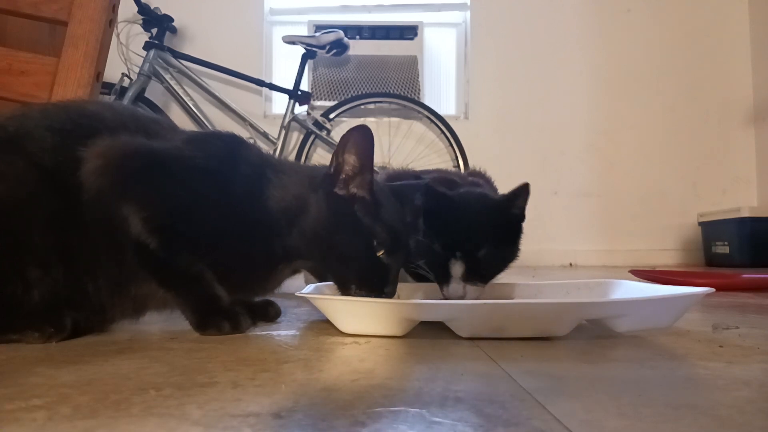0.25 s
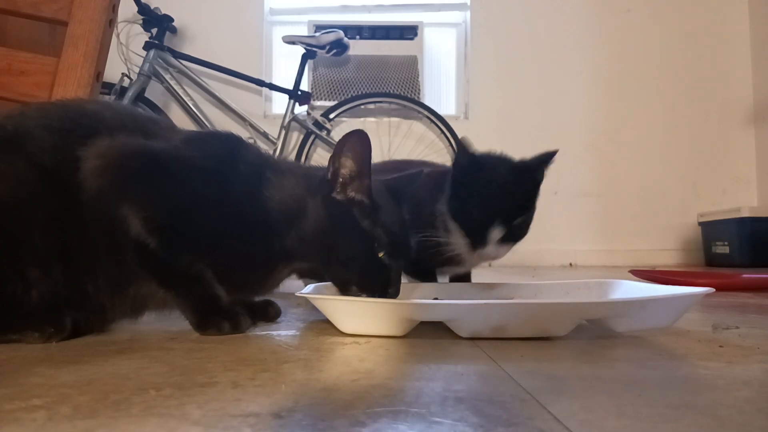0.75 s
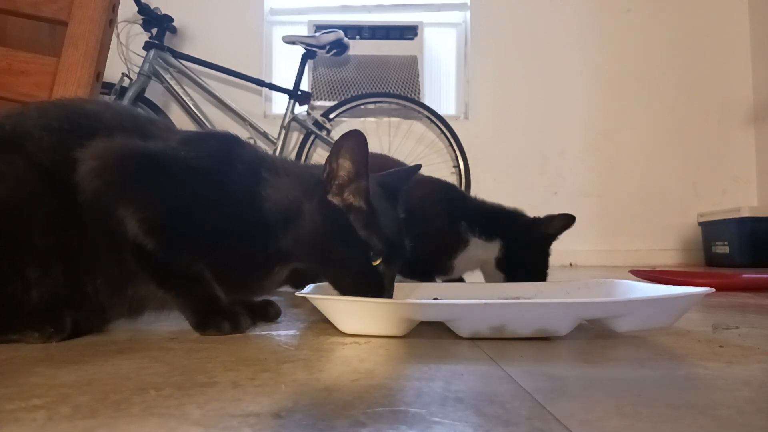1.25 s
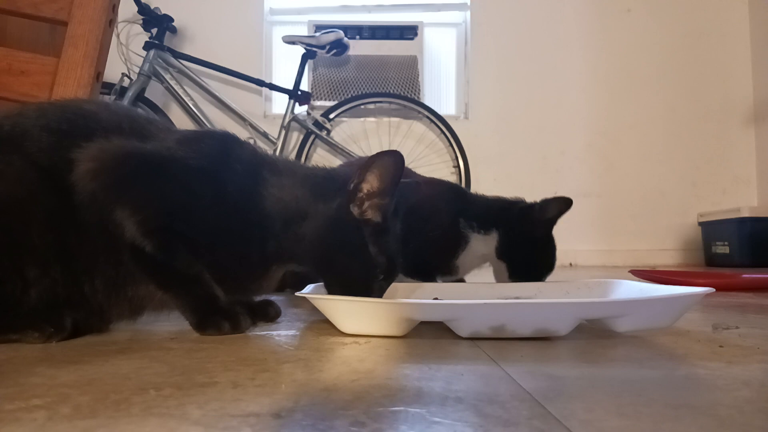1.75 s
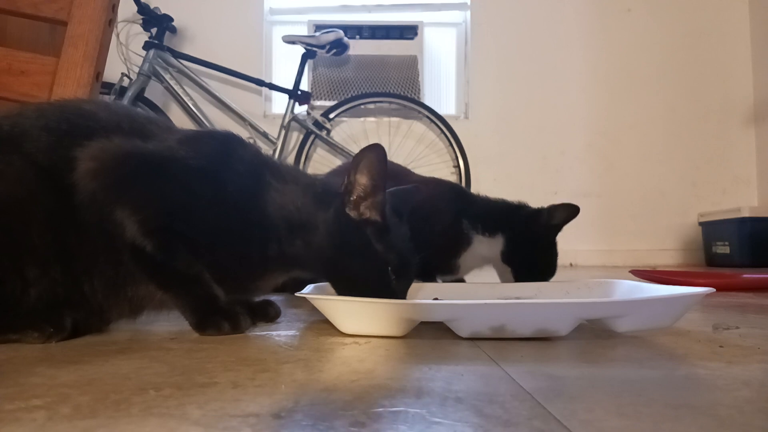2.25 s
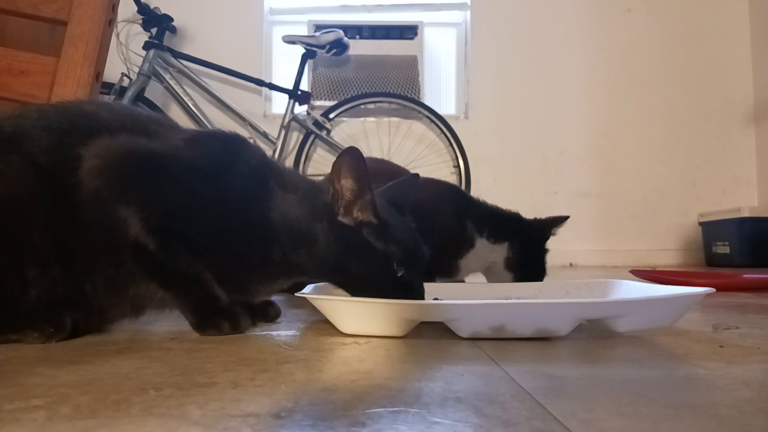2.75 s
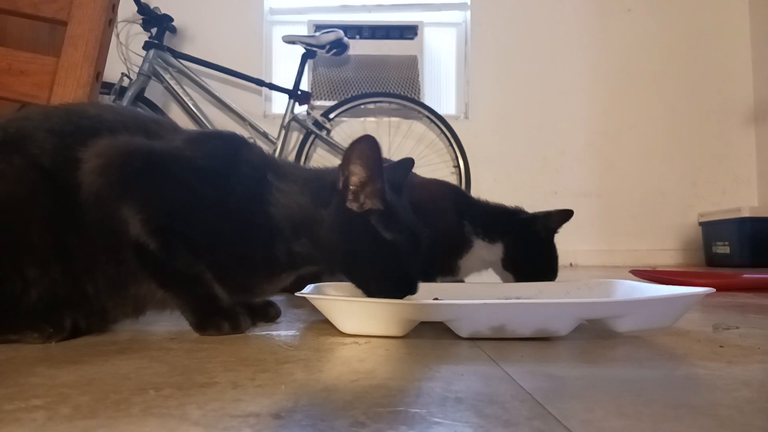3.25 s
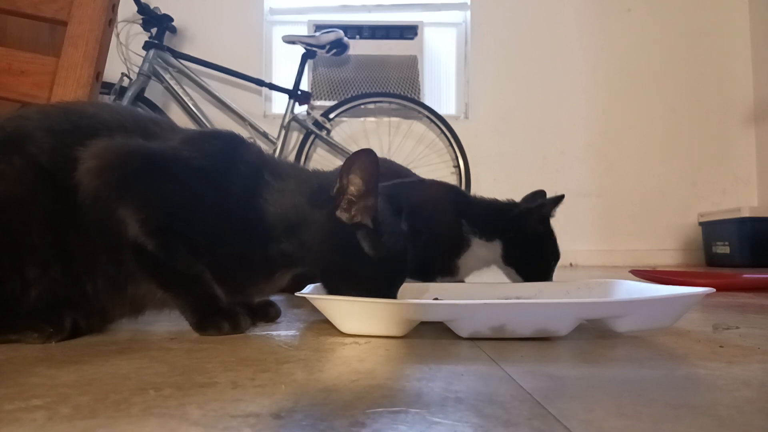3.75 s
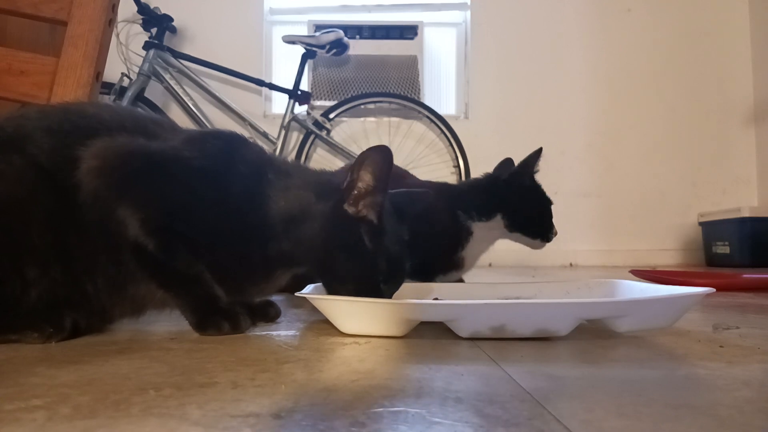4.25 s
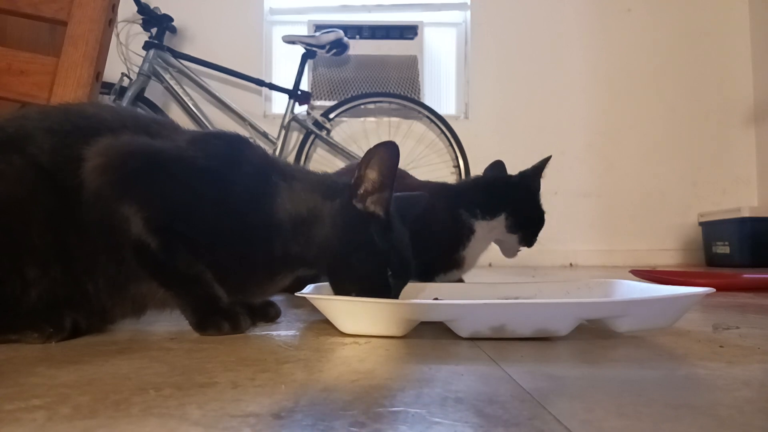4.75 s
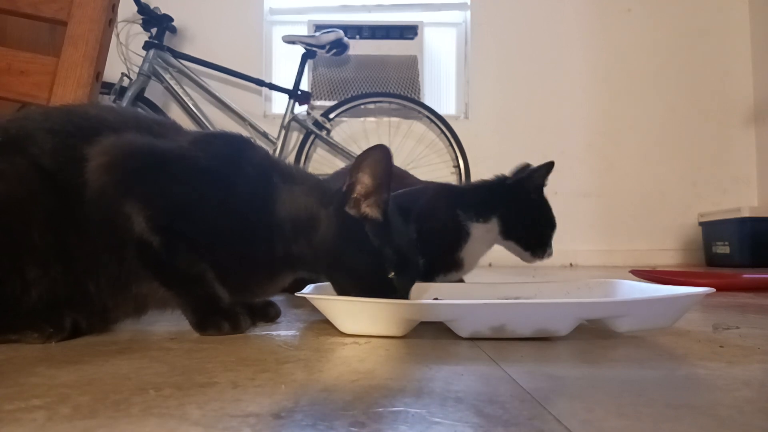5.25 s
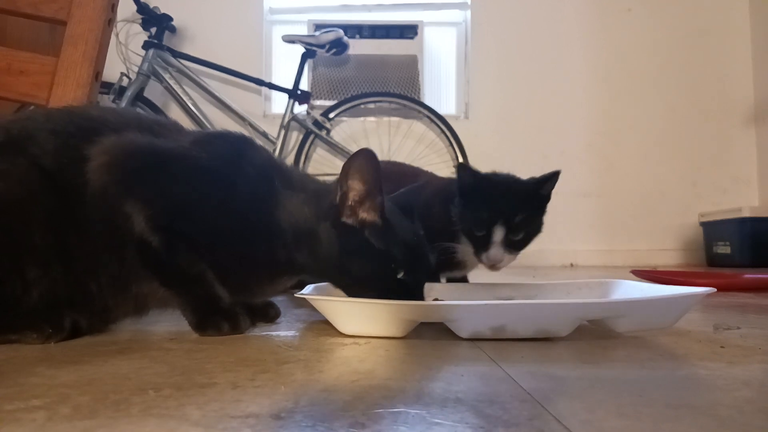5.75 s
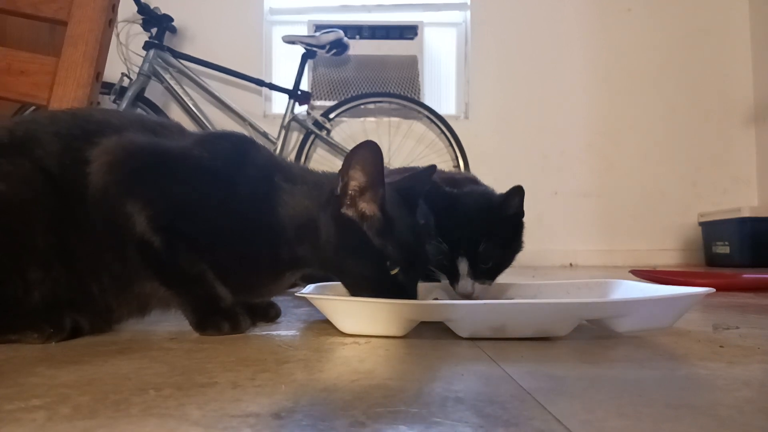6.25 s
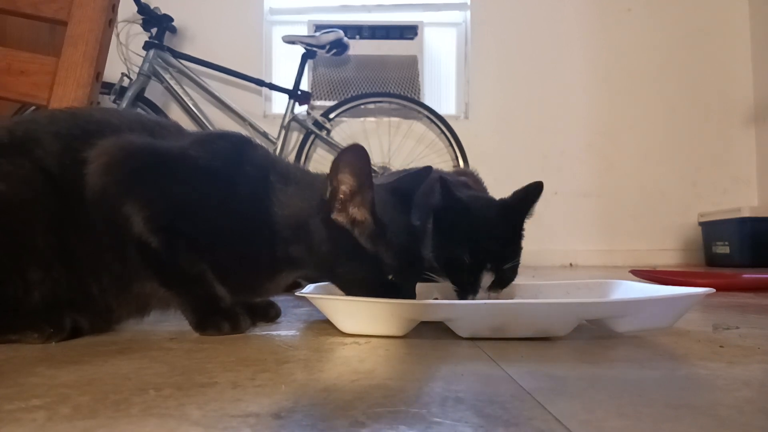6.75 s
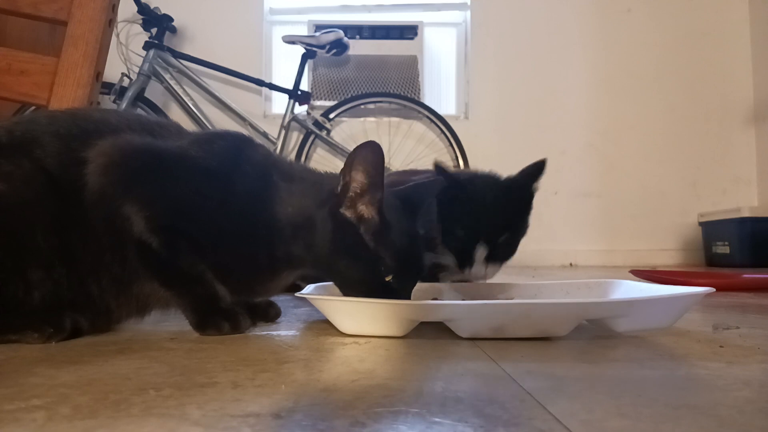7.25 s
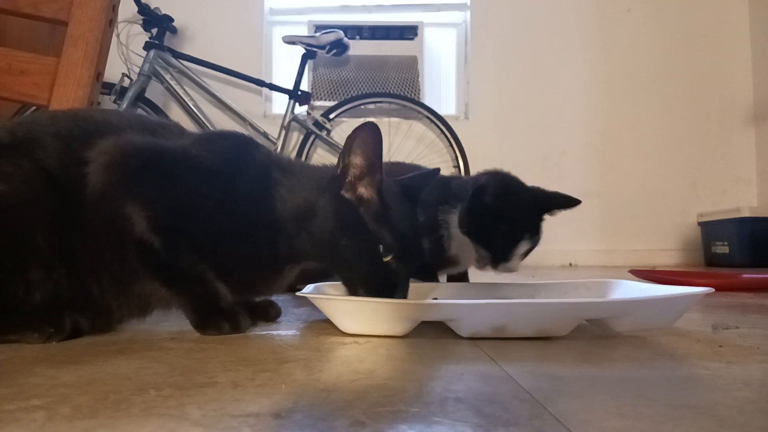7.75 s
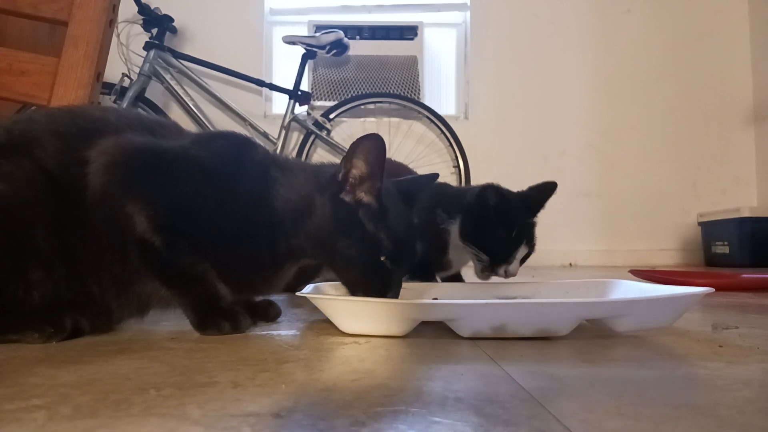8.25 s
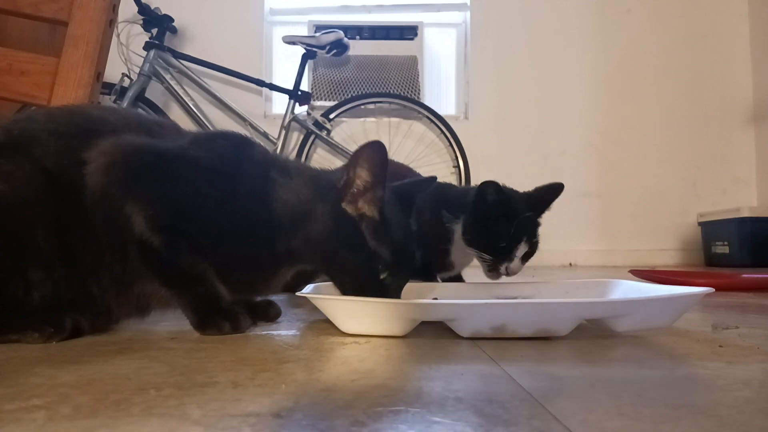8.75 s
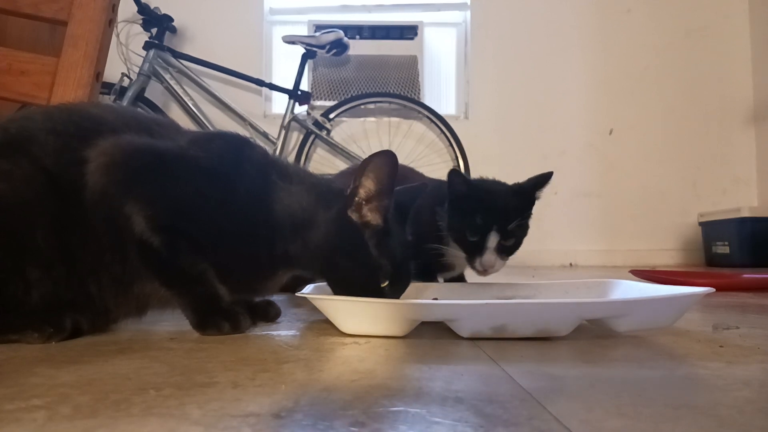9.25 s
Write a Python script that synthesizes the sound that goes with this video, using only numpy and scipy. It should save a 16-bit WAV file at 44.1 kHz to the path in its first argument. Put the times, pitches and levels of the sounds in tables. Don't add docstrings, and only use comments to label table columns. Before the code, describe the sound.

Dry, brittle cat-food crunching in uneven clusters, about half a metre from the microphones. Each bite is a snap with a few milliseconds of splintering. Tiny teeth clicks, short rasps and very faint nose whistles fill gaps, while hollow pellet knocks and scratchy pushes ring the tray. Busiest near the start and around seven seconds, thinning at the end, with short echoes in a bare indoor room.

```python
import sys
import numpy as np
from scipy import signal
from scipy.fft import rfft, irfft, next_fast_len
from scipy.io import wavfile
from scipy.ndimage import uniform_filter1d

SR = 44100
rng = np.random.default_rng(int(sys.argv[2]) if len(sys.argv) > 2 else 0)


def generate_wav(sig):
    pcm = np.round(np.clip(np.atleast_2d(sig).T, -1, 1) * 32767).astype(np.int16)
    wavfile.write(sys.argv[1], SR, pcm)


def ratio(d):
    e = np.asarray(d, float) / 20
    return 10 ** e


N = 419391


def unit(x):
    return x / np.sqrt(np.mean(x ** 2))


def even(x):
    return x / np.sqrt(np.sum(x ** 2, axis=-1, keepdims=True))


def on_log(hz, table):
    f, v = np.transpose(table)
    return np.interp(np.log(hz + 1), np.log(f), v)


def ring(f, hz, width_hz):
    return 1j * f * width_hz / (hz ** 2 - f ** 2 + 1j * f * width_hz)


def modes(f, table):
    return sum(ratio(db) * ring(f, hz, width_hz) for hz, width_hz, db in table)


def shape(x, gain):
    length = x.shape[-1]
    size = next_fast_len(length + min(4096, length // 2))
    f = np.arange(size // 2 + 1) * SR / size
    return irfft(rfft(x, size) * gain(f), size)[..., :length]


def walk(rate_hz):
    hold = int(SR / rate_hz)
    steps = np.repeat(rng.standard_normal(N // hold + 1), hold)
    return 1.3 * uniform_filter1d(uniform_filter1d(steps, hold), hold)[:N]


def splinters(size, rate_hz, spread_db):
    struck = rng.random(size) < rate_hz / SR
    size_db = spread_db * np.minimum(rng.exponential(size=size), 2.5)
    return struck * rng.standard_normal(size) * ratio(size_db)


# f/Hz, likeness/0-1
PORT_LIKENESS = [(60, 0.9), (200, 0.7), (640, 0.3), (1500, 0.5), (15000, 0)]


def alike(gain):
    like = lambda f: np.clip(on_log(f, PORT_LIKENESS), 0, 1)
    mid = shape(rng.standard_normal(N), lambda f: gain(f) * np.sqrt(1 + like(f)))
    side = shape(rng.standard_normal(N), lambda f: gain(f) * np.sqrt(1 - like(f)))
    return np.array([mid + side, mid - side]) / np.std(mid)


# f/Hz, density/dB per Hz
HISS = [(88, -39.5), (150, -2), (391, -6.5), (1480, -9.5), (2400, -13.5), (5000, -15), (12900, -13.5),
        (16000, -18)]
# t/s, level/dB
RUMBLE_LEVEL = [
    (0.0, -65),
    (5.529, -69),
    (5.72, -62.5),
    (6.62, -72.5),
    (7.12, -61),
    (7.41, -73),
    (7.52, -58),
    (7.95, -67),
    (9.51, -65),
]
# f/Hz, width/Hz, level/dB
RUMBLE_RINGS = [(58.1, 19, 3.5), (100, 13, 0), (133, 98, -14.5)]
HISS_DB = -71.5
GATE_DB, GATE_KNEE_DB, GATE_S = -4, -65.5, 0.068
TREBLE_GATE_DB, TREBLE_GATE_HZ = -5, 3700


def hum(food):
    low = alike(lambda f: sum(ratio(db) * np.abs(ring(f, hz, w)) ** 1.36 for hz, w, db in RUMBLE_RINGS))
    hiss = alike(lambda f: ratio(on_log(f, HISS)))
    busy = uniform_filter1d(np.abs(food[0]), int(GATE_S * SR))
    quiet = ratio(GATE_KNEE_DB) / (ratio(GATE_KNEE_DB) + busy)
    treble = shape(hiss, lambda f: 1 / (1 + (TREBLE_GATE_HZ / (f + 1)) ** 8))
    hiss = hiss + (ratio(TREBLE_GATE_DB * quiet) - 1) * treble
    rumble_db = np.interp(np.arange(N) / SR, *np.transpose(RUMBLE_LEVEL)) - 0.65 + 1.4 * walk(5.4)
    hiss_db = HISS_DB + GATE_DB * quiet + 0.54 * walk(5.7)
    return ratio(rumble_db) * low + ratio(hiss_db) * hiss


# f/Hz, t60/s, level/dB
ECHO_BANDS = [(236, 0.39, -27.5), (767, 0.35, 5.5), (2160, 0.19, -16), (4700, 0.62, -2.5),
              (10700, 0.13, -19)]
ROOM_DB, FIRST_WALL_S = -3, .012


def room(feed, length=40000):
    t = np.arange(length) / SR
    wall = np.clip((t - FIRST_WALL_S) / .001, 0, 1)
    rise = .55 * (t > .003) + wall * (.45 + .4 * np.exp(-np.abs(t - FIRST_WALL_S) / .006))
    noise = rng.standard_normal((2, length))
    noise = noise + shape(rng.standard_normal(length), lambda f: 2.0 / (1 + (f / 500) ** 2))
    echo = sum(ratio(db - 60 * t / t60_s) * shape(noise, lambda f: np.abs(ring(f, hz, 2.1 * hz)))
               for hz, t60_s, db in ECHO_BANDS)
    return signal.fftconvolve(feed[None], ratio(ROOM_DB) * even(rise * echo), axes=1)[:, :N]


# t/s, length/s, f/Hz, level/dB
NOSE_WHISTLES = [(3.8, 0.15, 2950, -74), (8.31, .09, 1950, -64), (4.235, 0.06, 1600, -68),
                 (3.425, .03, 2450, -62), (3.05, .1, 2500, -64), (8.68, .2, 3900, -72),
                 (8.42, .15, 5200, -64), (7.445, .035, 2650, -58), (4.775, 0.039, 2020, -70),
                 (4.75, 0.16, 3490, -76.5), (4.25, 0.14, 3500, -68), (4.4, .15, 3500, -78),
                 (4.9, 0.06, 2840, -80), (5.22, 0.1, 2750, -86), (5.04, .07, 2700, -92),
                 (5.135, 0.028, 1500, -84)]


def sniffs():
    out, t, air = np.zeros(N), np.arange(16384) / SR, rng.standard_normal(N)
    for start_s, length_s, hz, db in NOSE_WHISTLES:
        span = slice(int(start_s * SR), int(start_s * SR) + len(t))
        breath = np.sin(np.pi * np.clip(t / length_s, 0, 1))
        out[span] += ratio(db) * breath * unit(shape(air[span], lambda f: ring(f, hz, 200) ** 2))
    return out


# t/s, length/s, level/dB, f/Hz
RASPS = [
    (.469, .019, -33.5, 4700),
    (.219, 0.028, -47, 3300),
    (.203, 0.0054, -52, 8000),
    (7.479, 0.015, -52, 1800),
    (7.41, .07, -58, 6000),
    (4.548, .04, -62, 7000),
    (3.765, .03, -60, 3300),
    (1.883, .012, -56, 3500),
    (2.666, .012, -45, 2900),
]
RASP_EDGE_S = .0015


def scrapes():
    out, t = np.zeros((2, N)), np.arange(4096) / SR
    for start_s, length_s, db, hz in RASPS:
        rasp = rng.standard_normal(4096) + .7 * rng.standard_normal((2, 4096))
        rasp = unit(shape(rasp, lambda f: ring(f, hz, 1.9 * hz) ** 2))
        window = np.clip(np.minimum(t, length_s - t) / RASP_EDGE_S, 0, 1)
        at = int(start_s * SR)
        out[:, at:at + 4096] += ratio(db) * window * rasp
    return out


# start t/s, loudest t/s, end t/s, rattle level/dB, brightness/dB
TRAY_PUSHES = [(-.05, 0.005, 0.076, -29.5, -15), (.2, 0.15, 0.7, -40.5, -14.5),
               (0.515, 0.2, 0.54, -28.5, 1.5), (1.25, 1.297, 1.44, -49, -33), (2.0, 2, 2.3, -49, -11.5),
               (2.499, 2.58, 2.665, -39, -11), (2.664, 2.7, 2.784, -33, -12.5), (2.8, 2.86, 2.91, -35, -10),
               (2.92, 2.97, 3.01, -39, -25), (4.54, 4.61, 4.72, -48.5, -7), (5.295, 5.33, 5.35, -43, -13),
               (5.36, 5.39, 5.44, -48.5, -15), (5.499, 5.68, 5.81, -33, -26),
               (5.719, 5.82, 5.88, -36.5, -13), (5.9, 6, 6.34, -40.5, -19), (6.58, 6.5, 7.34, -48.5, -20.5),
               (6.753, 7, 6.85, -38.5, 5.5), (6.898, 6.96, 7.12, -39.5, -5.5), (7.043, 7, 7.2, -30.5, -27),
               (7.405, 7.42, 7.42, -50, -6), (7.488, 7.535, 7.56, -22, -42), (7.6, 7.68, 7.76, -40.5, -26),
               (8.91, 9, 9.3, -62, 2), (6.87, 6.925, 6.96, -52, 12), (6.58, 6.64, 6.67, -60, 12),
               (7.08, 7.098, 7.12, -42, 8), (2.25, 2.4, 2.5, -60, 6), (5.96, 6.0, 6.03, -50, 8)]
# f/Hz, width/Hz, level/dB
TRAY_RINGS = [(785, 30, 2.5), (1056, 340, 5.5), (1370, 59, 0), (1670, 71, -6)]
PUSH_EDGE_DB, PUSH_FADE_S = -16.5, 0.017


def pushes():
    t, level, bright = np.arange(N) / SR, np.zeros(N), np.zeros(N)
    for *times_s, db, bright_db in TRAY_PUSHES:
        swell_db = np.interp(t, times_s, [PUSH_EDGE_DB, 0, PUSH_EDGE_DB])
        window = np.clip(np.minimum(t - times_s[0], times_s[-1] - t) / PUSH_FADE_S + .5, 0, 1)
        push = window * ratio(db + swell_db)
        level += push
        bright += push * ratio(bright_db)
    knocks = splinters(N, 700, 3.5) + .7 * splinters((2, N), 2000, 2.5)
    knocks = ratio(2 * walk(60)) * knocks
    tray = shape(knocks, lambda f: ring(f, 2305, 1640) * (0.45 + modes(f, TRAY_RINGS)))
    scratch = unit(knocks) + 1.7 * rng.standard_normal((2, N))
    scratch = shape(scratch, lambda f: ring(f, 3800, 7700) ** 2)
    return (level * unit(tray) + bright * unit(scratch)) * ratio(-9.5)


# t/s, peak level/dB, ring f/Hz, thud/dB re peak
HARD_BITES = [(.03, -18.5, 2500, -11), (.52, -16.5, 2700, -9.5), (.578, -24, 2450, 2),
              (1.155, -45.5, 1490, -5), (1.572, -33, 4900, 1), (2.086, -23, 1030, -19),
              (2.087, -23.5, 4000, -36), (2.73, -29, 1480, -3), (2.931, -32, 980, -33),
              (3.216, -21.5, 3560, -40), (3.554, -19, 980, -9), (3.596, -29.5, 950, -23),
              (4.245, -42, 1560, 8.5), (5.034, -43, 3460, 2.5), (5.748, -25, 1750, -3),
              (6.419, -28, 1591, -16), (6.744, -31, 1490, -10), (7.07, -28.5, 660, 2),
              (7.167, -26.5, 1437, 6), (8.114, -15.5, 3300, -6.5), (8.19, -40, 520, 5),
              (8.288, -37, 2089, -10), ]
# t/s, peak level/dB, ring f/Hz, splinter/dB re peak
BRIGHT_SHATTERS = [(.22, -34, 2360, 2), (0.316, -28, 4240, -7), (2.883, -29.5, 2660, 11),
                   (3.785, -38, 3220, 3), (0.487, -15, 2790, 5), (2.43, -52, 1800, 23.5),
                   (7.169, -32, 1670, 15), (.548, -15.5, 1850, 11.5), (2.509, -54, 2470, 24.5),
                   (2.545, -39, 1650, 1), (3.872, -16.5, 7340, 8.5), (4.296, -33.5, 546, 15),
                   (4.298, -36, 626, -16), (4.545, -62, 1900, 26.5), (4.56, -51.5, 2200, 26),
                   (5.532, -44, 1670, 27), (6.391, -50, 1530, 21), (7.095, -15.5, 1290, -5.5),
                   (7.743, -22, 1687, 1), (8.089, -40, 1700, 17), (8.116, -14.5, 6900, 5.5),
                   (6.421, -30.5, 5060, 13), (6.758, -21, 5230, 6), (3.219, -26.5, 5560, -3.5),
                   (.549, -25, 5250, 6), (5.998, -39.5, 1600, 17.5), (8.916, -48.5, 1720, 21.5),
                   (9.086, -39, 3330, 12), (9.111, -42, 1720, 20), (2.566, -39.5, 1500, 21),
                   (9.266, -47, 2930, 1)]
# t/s, peak level/dB, ring f/Hz, splinter/dB re peak
SLOW_GRINDS = [(.376, -22.5, 1080, -7), (.426, -20, 1830, -1), (.468, -19, 2330, 4.5), (.523, -22, 2600, 0),
               (1.883, -42.5, 2540, 6), (2.69, -21.5, 1900, -10), (5.906, -24, 1420, -1),
               (7.06, -21, 2210, 0.5), (7.535, -23.5, 1700, -10.5), (.524, -20.5, 3000, -7),
               (2.669, -33.5, 1700, 1.5), (0.018, -26, 2300, -10.5)]
# t/s, peak level/dB, ring f/Hz
NEAR_CAT_TICKS = [(1.133, -49, 4070), (1.231, -53, 2440), (1.248, -47, 4500), (1.254, -36.5, 4200),
                  (1.257, -33.5, 5600), (1.502, -54, 3500), (1.564, -46, 5000), (1.302, -26, 5300),
                  (1.346, -30, 5050), (1.413, -40, 1980), (1.547, -47, 5330), (1.897, -26, 5560),
                  (1.99, -38, 5200), (2.014, -45, 4030), (2.033, -26, 4000), (2.037, -22.5, 4030),
                  (1.999, -44, 4000), (.789, -52, 6400), (.807, -47, 5200), (.813, -40, 5190),
                  (.827, -41, 4800), (.843, -48, 6600), (4.965, -55, 4500), (2.522, -42.5, 2180),
                  (2.809, -30, 2850), (2.827, -27.5, 2740), (3.047, -33.5, 2460), (3.083, -37, 2460),
                  (3.103, -41, 2380), (3.161, -32.5, 2650), (3.397, -50, 5000), (3.432, -39.5, 2460),
                  (3.5, -34, 2050), (3.77, -37.5, 3180), (3.228, -42, 6000), (4.999, -43, 3680),
                  (5.135, -60, 6000)]
# t/s, peak level/dB, ring f/Hz
FAR_CAT_TICKS = [(7.416, -44, 4700), (7.449, -50, 1300), (7.84, -36, 2945), (7.846, -35, 3627),
                 (7.854, -37, 4550), (8.341, -47, 4500), (8.659, -52, 6100), (8.289, -36, 4700),
                 (8.396, -56, 4000), (7.951, -38, 2350), (8.006, -44.5, 1740), (8.042, -48, 2400),
                 (8.306, -28, 1980), (8.411, -25, 3860), (8.42, -22.5, 5600), (8.461, -28.5, 1490),
                 (8.673, -30.5, 1670), (8.942, -42, 1350), (8.972, -44, 3280), (8.99, -53.5, 3120),
                 (9.068, -51, 3770), (9.158, -42, 1100)]
# t/s, peak level/dB, ring f/Hz
TRAY_KNOCKS = [(.203, -38, 2280), (.304, -29, 1280), (0.362, -33, 1700), (.86, -49, 1350),
               (2.34, -42.5, 1770), (2.429, -46.5, 1750), (2.565, -36.5, 1520), (2.646, -29, 1800),
               (2.678, -26.5, 1700), (2.683, -25.5, 1980), (2.956, -26.5, 1700), (3.566, -26, 1490),
               (3.657, -38, 5470), (4.597, -39.5, 1390), (4.662, -48.5, 1240), (5.307, -40, 1480),
               (5.328, -41, 1500), (5.347, -47.5, 1490), (5.386, -41.5, 1420), (5.394, -52, 1210),
               (5.986, -31.5, 1860), (5.86, -37, 1570), (5.795, -31, 1390), (5.507, -48, 1120),
               (5.627, -28, 1560), (5.654, -34, 1380), (5.708, -23.5, 1670), (5.822, -27, 1380),
               (5.929, -18.5, 1670),
               (6.045, -31, 1750), (6.069, -23.5, 1480), (6.2, -43, 1590), (6.237, -34.5, 1704),
               (6.269, -25, 1740), (6.289, -34, 1740), (6.356, -38.5, 1660), (6.559, -44, 1140),
               (6.596, -46.5, 1070), (6.642, -37, 1160), (6.706, -29, 1340), (6.757, -26.5, 1580),
               (6.842, -30.5, 1200), (6.877, -28.5, 980), (6.929, -30, 1520), (6.983, -25.5, 1470),
               (7.071, -21, 1800), (7.253, -26.5, 1780), (7.416, -40, 1087), (7.543, -18.5, 1840),
               (7.659, -25, 1440), (7.705, -23, 1700), (7.774, -36.5, 1603), (7.781, -33.5, 1603),
               (6.572, -48, 1100), (6.666, -43, 1100), (6.775, -31, 1200), (6.942, -33.5, 1500),
               (7.077, -22.5, 1500)]
# t/s, peak level/dB, ring f/Hz
TRAY_SHOVES = [(7.491, -25.5, 915), (7.498, -27, 1000), (7.504, -14, 1140), (7.509, -17.5, 1290),
               (7.515, -22, 1300), (7.522, -20.5, 1000), (7.531, -19.5, 1500), (7.539, -21, 1790),
               (7.542, -19.5, 1700), (7.549, -23, 1300), (7.569, -28.5, 1100), (7.575, -27, 1500),
               (7.596, -29, 1200), (.002, -27.5, 1510), (.05, -31, 2210), (.862, -46, 3020)]
# t/s, peak level/dB, ring f/Hz
CLEAN_SNAPS = [(.5475, -17, 2000), (.4865, -20, 2900), (.524, -21, 3000), (.578, -25, 2300),
               (3.565, -26, 1500), (1.898, -30, 5000), (2.682, -28, 2400), (2.695, -30, 2300),
               (2.733, -30, 1500), (4.295, -38, 600), (4.244, -44, 600), (8.19, -35, 600),
               (6.641, -46, 6000), (6.586, -52, 9000), (6.39, -44, 4500), (6.358, -50, 5000),
               (2.015, -42, 5000), (8.42, -28, 5600), (7.705, -27, 1700)]
# thud/dB, splinter/dB, broad share, body f/Hz
BITE_COLOUR = (1.2, -7.5, 0.74, 2127)
SHATTER_COLOUR = (-16.5, -2.5, 0.65, 2120)
GRIND_COLOUR = (-19, -3, 1.8, 2000.5)
TICK_COLOUR = (-43, -20, 0.5, 3395)
FAR_TICK_COLOUR = (-15.5, -9, 0.5, 3297)
KNOCK_COLOUR = (-42.5, -11, 0.2, 1916.5)
SHOVE_COLOUR = (-13, -22.5, 0.6, 1499)
SNAP_COLOUR = (-12, -8, 0.6, 2200)
# snap share, crumble/s, jaw share, top f/Hz, room/dB, ring gain, ring width re ring f
BREAKING = [
    (2.4, 0.0037, 0.66, 13000, -1.5, 1.74, .25),
    (2.2, 0.0036, 0.41, 11800, -1.5, 1.8, 0.26),
    (.1, 0.0088, .4, 12000, -1, 2.1, 0.4),
    (3.6, 0.0031, 0.26, 8700, -1.5, 0.91, 0.23),
    (4.4, 0.0055, 0.53, 6900, -2.5, 1.94, 0.084),
    (2, 0.0043, 0.13, 7200, -4.5, 2.3, 0.31),
    (0.93, 0.0022, .1, 6000, -3, 2.2, 0.49),
    (6, .0012, .2, 12000, -6, 1.5, .4),
]


def crack_rows():
    thud_db, *colour = BITE_COLOUR
    rows = [(s, db, hz, own_db + thud_db, *colour, *BREAKING[0]) for s, db, hz, own_db in HARD_BITES]
    bright = [(BRIGHT_SHATTERS, SHATTER_COLOUR), (SLOW_GRINDS, GRIND_COLOUR)]
    for (table, (thud_db, high_db, *colour)), way in zip(bright, BREAKING[1:]):
        rows += [(s, db, hz, thud_db, own_db + high_db, *colour, *way) for s, db, hz, own_db in table]
    plain = [(NEAR_CAT_TICKS, TICK_COLOUR), (FAR_CAT_TICKS, FAR_TICK_COLOUR),
             (TRAY_KNOCKS, KNOCK_COLOUR), (TRAY_SHOVES, SHOVE_COLOUR), (CLEAN_SNAPS, SNAP_COLOUR)]
    for (table, colour), way in zip(plain, BREAKING[3:]):
        rows += [(*row, *colour, *way) for row in table]
    return np.transpose(rows)[:, :, None]


# f/Hz, width/Hz, level/dB
NEAR_JAW_RINGS = [(1490, 87, -7), (2540, 260, -1.5), (3650, 160, -3), (6900, 440, -2), (8900, 140, 2.5),
                  (12200, 2400, 5.5)]
# f/Hz, width/Hz, level/dB
FAR_JAW_RINGS = [(1700, 340, 4), (3880, 120, 3), (5300, 1522, 3), (6600, 510, 4), (12550, 2200, 9.5)]
FAR_JAW_FROM_S = 8.25
NEAR_JAW_IN_ROOM, FAR_JAW_IN_ROOM = .4, 1.1


def jaw_ring(f, s, jaw_share, mouth):
    far = s > FAR_JAW_FROM_S
    direct = np.ones_like(s)
    share = jaw_share * np.array([direct, direct, np.where(far, FAR_JAW_IN_ROOM, NEAR_JAW_IN_ROOM)])
    return share * np.where(far, modes(f, FAR_JAW_RINGS), modes(f * mouth, NEAR_JAW_RINGS))


FLOOR_ECHO_S, FLOOR_ECHO = 0.001312, -0.28
ASIDE_HZ = 11100
MOUTH_SPREAD, THUD_ROOM_DB, SPLINTER_SOFTEN = 0.04, -3.5, .6
SPOTS = 3


def cracks(length=2048):
    (s, db, hz, thud_db, high_db, broad, body_hz, sharp, crumble_s, jaw_share, top_hz, wet_db,
     ring_gain, ring_width) = crack_rows()
    t = np.arange(length) / SR
    click = lambda at_s: 2. * (np.arange(length) == int(at_s * SR))
    snap = sharp * (click(.0016) + FLOOR_ECHO * click(.0016 + FLOOR_ECHO_S))
    grain, *scatter, ragged, uneven, opening = rng.standard_normal((6, len(s), length))
    scatter = np.array(scatter)
    mouth = 1 + MOUTH_SPREAD * opening[:, :1]
    crumble = (1 - np.exp(-3 * t / crumble_s)) ** 2 * np.exp(-t / crumble_s)
    crumbs = .85 * crumble * ratio(2.2 * uneven)
    direct = snap * (0.98 + 0.41 * scatter) + crumbs * (grain + 0.71 * scatter)
    to_room = click(.001) + .18 * np.exp(-t / .0005) * ragged
    force = np.array([*direct, to_room])

    jaw = lambda f: jaw_ring(f, s, jaw_share, mouth)
    top_cut = lambda f: (top_hz ** 2 / (top_hz ** 2 - f ** 2 + 1.3j * f * top_hz)) ** 2
    pellet = lambda f: ring_gain * ring(f, hz, ring_width * hz)
    body = shape(force, lambda f: ((broad + jaw(f)) * ring(f, body_hz, 2.8 * body_hz) + pellet(f))
                 * ring(f, body_hz, 2.36 * body_hz) * top_cut(f))
    thud = shape(force, lambda f: ring(f, 734, 850) ** 2)
    thud_db = thud_db + np.array([0, 0, THUD_ROOM_DB])[:, None, None]
    force[:2] -= SPLINTER_SOFTEN * snap * (.94 + .45 * scatter)
    high = shape(force, lambda f: (1.0 + jaw(f)) * ring(f, 6750, 14000) ** 2)
    sound = even(body) + ratio(thud_db - 7.0) * even(thud) + ratio(high_db - 11.0) * even(high)
    sound = ratio(db + 11.0) * sound
    sound[2] *= ratio(wet_db)

    at = (s * SR).astype(int) + np.arange(length)
    place = lambda at, x: np.bincount(at.ravel(), x.ravel(), N + length)[:N]
    ports = np.array([place(at, x) for x in sound[:2]])
    feeds = [place(at[k::SPOTS], sound[2, k::SPOTS]) for k in range(SPOTS)]
    return shape(ports, lambda f: 1 / (1 + 1j * f / ASIDE_HZ)), feeds


PORT_LAG_S, PORT_TURN_RAD = .00009, 1.85
NEAR_PAN_DB = -1.5


def scene():
    near, feeds = cracks()
    rattle = pushes() + sniffs() + scrapes()
    near = near + rattle
    lag_rad = lambda f: PORT_TURN_RAD * np.tanh(2 * np.pi * f * PORT_LAG_S / PORT_TURN_RAD)
    near[1] = shape(near[1], lambda f: np.exp(-1j * lag_rad(f)))
    near = near * ratio(NEAR_PAN_DB * np.array([[.5], [-.5]]))
    feeds[0] = feeds[0] + ratio(0.44) * rattle.mean(axis=0)
    food = near + sum(room(feed) for feed in feeds)
    return food + hum(food)


def roll_off(x):
    return signal.sosfilt(signal.butter(12, 16960, fs=SR, output="sos"), x)


# f/Hz, left minus right/dB
PORT_COLOUR = [(60, 6), (150, 2.5), (330, 3.5), (700, -3), (1500, -4.5), (4400, -1.5), (8120, 3.5),
               (15000, 12)]
TOP_HZ = 15900


def record(dry):
    side = np.array([[.5], [-.5]])
    ports = shape(dry, lambda f: ratio(side * on_log(f, PORT_COLOUR) - 36 * (f > TOP_HZ)))
    return roll_off(ports)


dry = scene()
out = record(dry)
generate_wav(out)
```